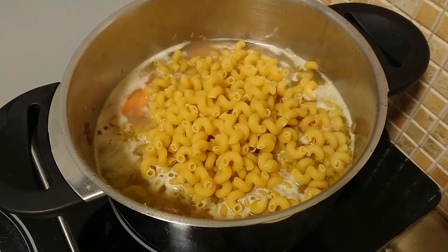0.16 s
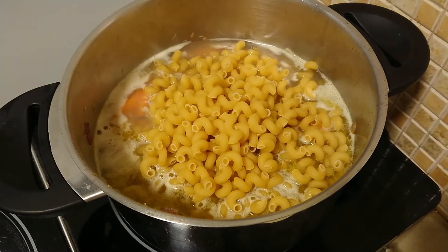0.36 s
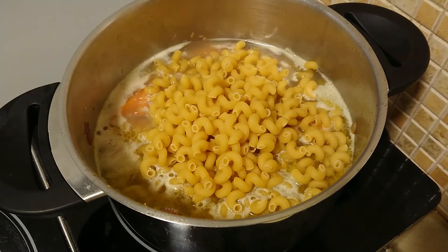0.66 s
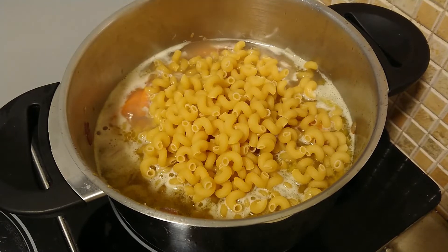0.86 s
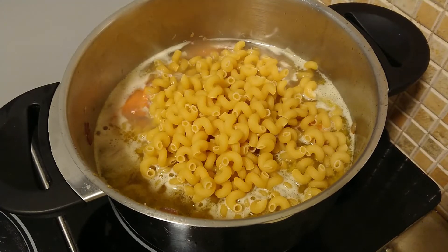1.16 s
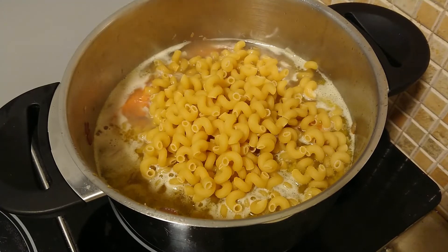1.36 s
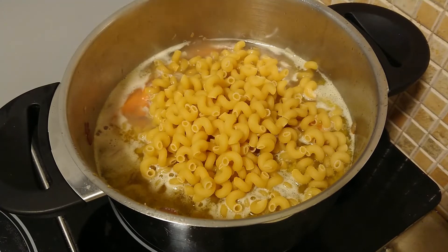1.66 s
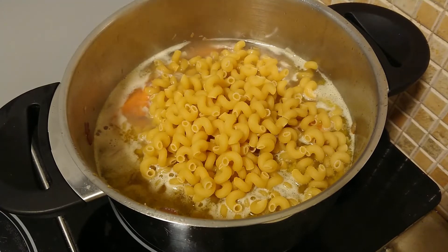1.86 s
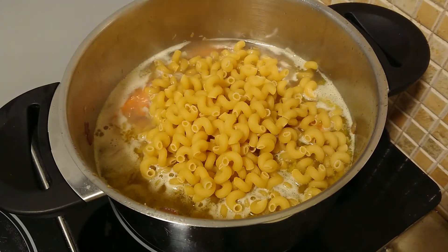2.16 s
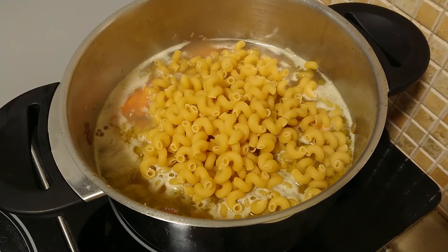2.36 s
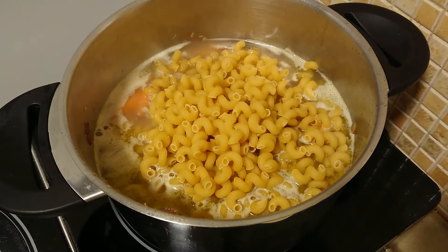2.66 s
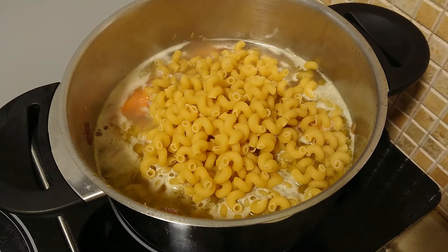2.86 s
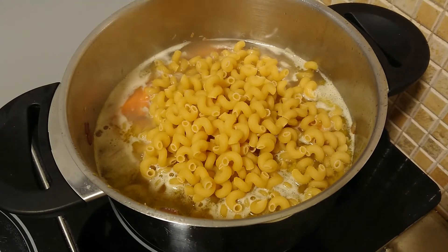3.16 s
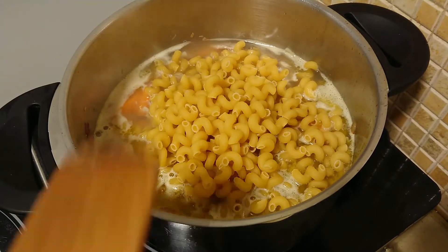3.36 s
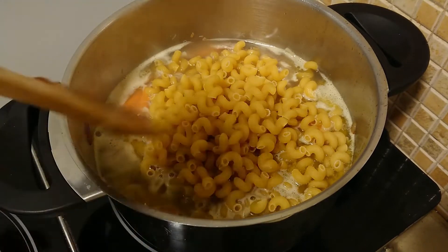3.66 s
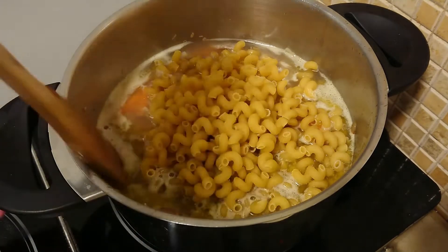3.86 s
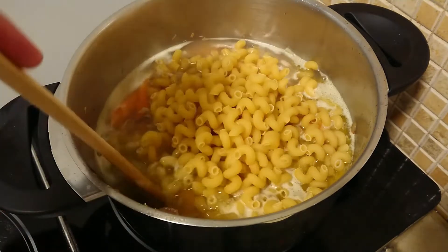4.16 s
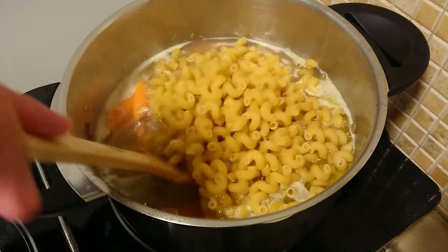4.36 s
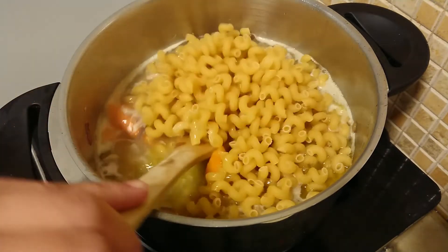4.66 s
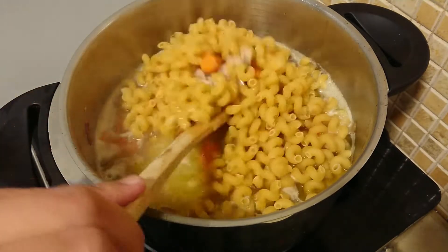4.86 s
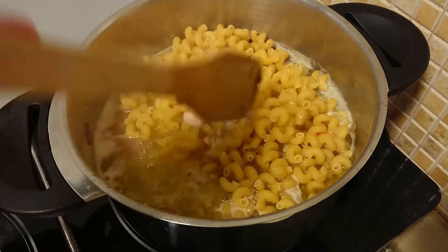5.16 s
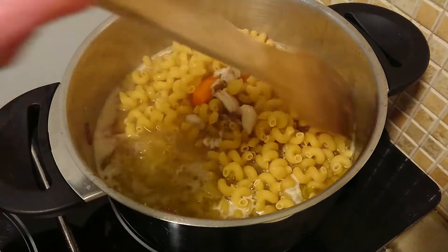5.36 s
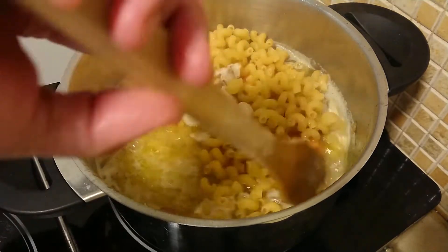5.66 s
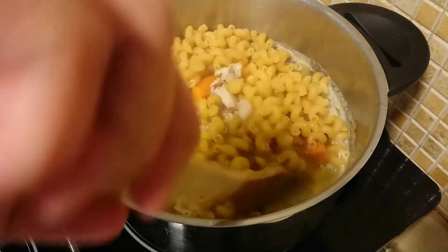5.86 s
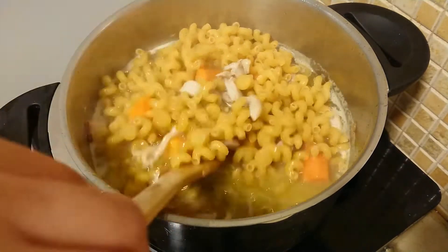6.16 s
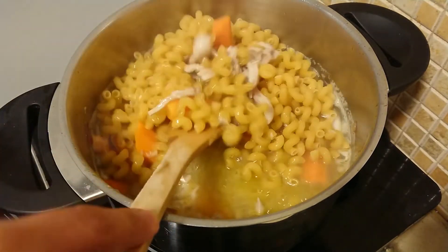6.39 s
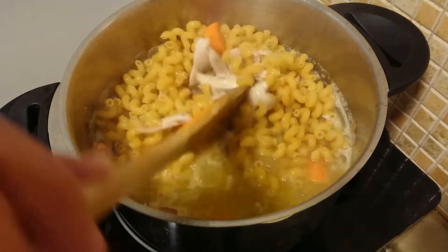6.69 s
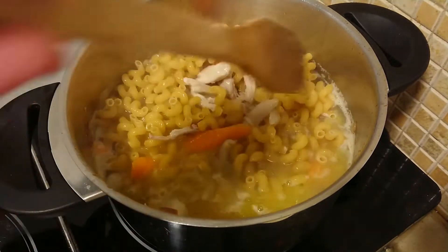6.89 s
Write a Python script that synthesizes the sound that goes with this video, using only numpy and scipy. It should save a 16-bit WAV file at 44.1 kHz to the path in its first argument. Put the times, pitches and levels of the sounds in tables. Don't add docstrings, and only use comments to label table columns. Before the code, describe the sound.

Close stereo in a small, hard-walled kitchen with a short room tail. First there is only fan rumble, faint hiss and sparse simmer ticks. Wood scrapes lightly, then two loud knocks ring the worktop. Soft dull bumps follow as the spoon enters the pot, then three bursts of stirring: dry brittle pasta clatter mixed with fizzy, sloshing liquid and one small gulp, fading to the fan.

```python
import sys
import numpy as np
from scipy import signal
from scipy.fft import rfft, irfft, next_fast_len
from scipy.io import wavfile
from scipy.ndimage import uniform_filter1d

SR = 44100
rng = np.random.default_rng(int(sys.argv[2]) if len(sys.argv) > 2 else 0)


def convert_level_to_amplitude(level_db):
    exponent = np.asarray(level_db, float) / 20
    return 10 ** exponent


def persist_wave(psi):
    counts = np.round(np.clip(psi, -1, 1) * 32767).astype(np.int16)
    wavfile.write(sys.argv[1], SR, np.atleast_2d(counts).T)


N = 310023

# time_s, level_db
FIRST_STROKE = [(4.03, -69), (4.136, -68), (4.24, -66.5), (4.33, -68), (4.40, -58), (4.52, -58.5),
                (4.585, -62.5), (4.66, -53.5), (4.74, -58.5)]
FIRST_SWEEP = [(4.8, -56.5), (4.885, -53.5), (4.91, -46), (4.99, -53), (5.06, -51), (5.11, -57),
               (5.18, -52.5), (5.238, -66.5), (5.4, -77)]
SECOND_STROKE = [(5.47, -78), (5.51, -55), (5.555, -60), (5.6, -52), (5.65, -57.5), (5.75, -60.5),
                 (5.8, -58.5), (5.86, -59.5)]
THIRD_STROKE = [(5.9, -60), (6.07, -58.5), (6.14, -50), (6.23, -57), (6.33, -55), (6.4, -52), (6.55, -57.5),
                (6.75, -62), (6.92, -68), (7.03, -91)]
# start_s, fizz_against_rattle_db
WETNESS = [
    (4.03, 4),
    (5.45, -10),
    (5.87, -4),
]
# frequency_hz, density_db_per_hz
RATTLE_COLOUR = [(350, -41), (600, -4), (823, 2), (957, -56), (1050, -2.5), (1980, -10.5), (2800, 0.5),
                 (3080, 2), (3340, 0), (4980, 0), (5560, -8), (7600, 0), (16000, -19)]
# frequency_hz, density_db_per_hz
FIZZ_COLOUR = [(3500, -22), (5500, -17), (8000, -10), (10000, -18.5), (13000, -21.5), (16000, -21)]
# start_s, peak_db, ring_hz
HEAVY_TICKS = [(4.0695, -29.5, 5530), (4.0935, -33.5, 2380), (4.672, -23.5, 4860), (4.7159, -29, 6200),
               (4.7481, -22, 3300), (4.7844, -48, 4200), (4.8589, -32, 7860), (4.8969, -16, 5100),
               (4.954, -27.5, 4500), (5.0185, -28, 7740), (5.0484, -21, 4300), (5.1008, -35, 5500),
               (5.224, -40, 2190), (5.4729, -26, 2260), (5.5857, -23, 3420), (5.697, -42, 2570),
               (5.7706, -35, 3170), (5.7855, -33, 5830), (6.1209, -32, 5800), (6.142, -27, 6000),
               (6.1912, -28.5, 3140), (6.269, -32, 4020), (6.4212, -36, 4640), (6.4463, -30.5, 2350),
               (6.5126, -25.5, 5520), (6.6647, -32, 5260), (6.7528, -32, 2580), (6.7674, -41, 4200),
               (6.781, -34.5, 7900)]
# start_s, peak_db, ring_hz
LIGHT_TICKS = [(4.2043, -38.5, 6160), (4.2423, -39, 4080), (4.279, -41, 4200), (4.3999, -49, 2170),
               (4.4785, -31, 8600), (4.5132, -33, 6300), (4.5925, -38, 8000), (4.618, -30.5, 8500),
               (4.6425, -36, 4600), (4.8335, -30.5, 3600), (5.185, -33, 5100), (5.4979, -19, 4320),
               (5.5672, -23.5, 3300), (5.606, -33, 3700), (5.7132, -29.5, 3110), (5.9491, -29, 5440),
               (5.9702, -31.5, 6140), (6.048, -40.5, 4260), (6.187, -32, 3500), (6.3365, -37, 7000),
               (6.3488, -30, 4700), (6.378, -27.5, 3590), (6.5326, -35, 3620), (6.6025, -36.5, 6460),
               (4.6672, -31, 4940), (4.892, -27, 4930), (5.173, -37, 9000), (5.181, -32.5, 7440),
              (5.212, -37.5, 7700), (5.663, -33.5, 4300), (6.5001, -43, 3600), (6.8853, -58, 7760),
              (6.9, -52, 8200), (6.916, -43, 8850)]
# start_s, peak_db, ring_hz
TUMBLES = [(4.0477, -43, 4700), (4.132, -52, 5520), (4.1475, -44, 4940), (4.1649, -55, 7910),
           (4.1954, -46, 4870), (4.2184, -40, 7850), (4.335, -48, 6380), (4.3675, -37, 5230),
           (4.3944, -43, 6070), (4.4049, -30, 7900), (4.555, -42, 7660), (4.5645, -40, 7900),
           (4.6, -40, 6120), (4.786, -38, 6410), (4.802, -37, 8140), (4.8264, -38, 6930),
           (4.8654, -31, 6340), (5.002, -31, 7530), (5.0534, -29, 7910), (5.1173, -41, 5960),
           (5.1284, -37, 5900), (5.145, -42, 5860), (5.1954, -41, 7820), (5.5747, -35, 4550),
           (5.5914, -38, 4700), (5.7364, -58, 4600), (5.8474, -48, 4640), (5.876, -50, 5560),
           (5.9274, -43, 6230), (5.9944, -38, 5810), (6.0955, -40, 5450), (6.128, -31, 6370),
           (6.1654, -37, 7910), (6.2367, -43, 5540), (6.2866, -43, 5020), (6.3854, -29, 5170),
           (6.4634, -47, 8500), (6.4817, -45, 6530), (6.5804, -49, 4960), (6.6486, -41, 4600),
           (6.7136, -46, 4680), (6.7904, -52, 5160), (6.8294, -46, 6460), (6.8653, -47, 7560),
           (6.9646, -64, 4530), (7.015, -57, 4530)]
# start_s, peak_db, ring_hz
OVERTONES = [(0.302, -44.5, 6000), (3.039, -37.5, 6540), (3.7698, -39.5, 7500), (3.857, -51, 7000),
             (3.875, -52, 8000), (5.698, -44, 5000), (4.2424, -38, 8400), (4.279, -46, 8000),
             (4.7478, -23, 6470), (4.763, -33, 4600), (4.879, -30.5, 7000), (4.8965, -25, 8000),
             (4.916, -31, 7800), (5.0195, -23, 6000), (5.4975, -29, 7700), (5.5668, -35.5, 7400),
             (6.356, -37, 4500), (6.378, -37, 7800), (6.4463, -34.5, 5800), (6.513, -32, 9200),
             (6.513, -40, 13000)]
# start_s, peak_db, ring_hz
TOUCH = [
    (3.7698, -31, 2840),
]
# frequency_hz, width_hz, level_db
POT_MODES = [(605, 25, 6.5), (870, 40, -3.5), (2190, 24, 4.5), (3260, 24, -6), (4260, 32, -16)]
# start_s, peak_db, frequency_hz, t60_s
WALL_RINGS = [(4.335, -50, 2100, 0.065), (4.4, -37.5, 2130, 0.064), (4.557, -48, 2100, .05),
              (4.673, -37, 3170, .04), (4.75, -32, 3140, .05), (4.834, -38, 4350, .04),
              (4.947, -33, 3130, 0.076), (5.184, -40, 2900, .04), (5.224, -25, 2180, 0.031),
              (6.194, -43, 3170, .04), (6.237, -50, 3100, .04), (6.286, -44, 3190, .06),
              (6.355, -43, 3130, .06), (6.377, -41, 3150, 0.064), (6.398, -36.5, 3130, .06),
              (6.423, -48, 3070, .04), (6.452, -33, 2440, 0.047), (6.641, -47, 2570, .05),
              (6.667, -37.5, 4260, 0.026), (6.767, -45, 4220, .04)]
# start_s, peak_db, frequency_hz, t60_s
BUMPS = [(.30, -43, 399, 0.051), (2.972, -51, 644, 0.1), (3.074, -39.5, 662, 0.043),
         (3.769, -37, 423, 0.072), (3.856, -35.5, 457, 0.053), (3.86, -43, 900, 0.06),
         (3.885, -44, 382, 0.09), (3.915, -44.5, 521, 0.07), (5.417, -31.5, 326, 0.034),
         (5.422, -43.5, 815, 0.049), (6.074, -43, 319, 0.21), (6.12, -45, 383, 0.089),
         (6.45, -32, 900, 0.01), (6.864, -36.5, 1410, 0.012)]
# start_s, peak_db, start_hz, end_hz, length_s
GULPS = [
    (4.711, -35.5, 430, 268.6, 0.03),
]
# start_s, peak_db, hardness_hz, left_right_db, ringing_against_crack_db
LIFT = [
    (2.0351, -25.5, 9060, -1.5, 5.5),
    (2.0445, -31.5, 6000, -7, 3),
]
FIRST_KNOCK = [(2.2522, -17.5, 2980, 1.9, -7), (2.2565, -14.5, 4830, 1.3, 1),
               (2.261, -16.5, 6950, 1.1, 1.5), (2.281, -25.5, 5000, -1.5, 6),
               (2.305, -23, 4000, -1.5, -5.5), (2.353, -32.5, 4000, -1.5, -2),
               (2.358, -32.5, 4000, -1.5, 0)]
SECOND_KNOCK = [(2.6398, -12, 2500, 1, -3.5), (2.647, -16, 4000, 1.4, -4), (2.653, -21, 5000, 1.3, -4),
                (2.660, -22, 6000, 1.3, 7), (2.668, -23, 5000, 1.5, -1)]
# start_s, peak_db, frequency_hz, t60_s
THUMPS = [
    (2.6398, -7.5, 710, 0.024),
    (2.2565, -26.5, 510, 0.03),
    (2.3545, -29.5, 1070, 0.074),
]
# frequency_hz, width_hz, level_db
LIFT_MODES = [(876, 26, -23), (2700, 130, -7), (3020, 120, -4.5), (3500, 220, -7), (3963, 110, -4.5),
              (6660, 200, -16)]
# frequency_hz, density_db_per_hz
LIFT_CRACK = [(500, -30), (880, -12), (1300, -22), (2300, -18), (2800, -4), (4000, -3), (4500, -20),
              (6500, -15), (11000, -24), (16000, -42)]
# frequency_hz, density_db_per_hz
KNOCK_CRACK = [(150, 4.5), (400, -27), (560, -7.5), (1000, -11.5), (2000, -6.5), (3300, -23.5),
               (4500, -7.5), (5100, -23), (5600, -16), (8000, -20), (13500, -33), (16000, -48)]
WORKTOP_HZ = [616, 725, 829, 934, 1045, 1260, 1454, 1570, 1700, 1899, 2001, 2199, 2440, 2563, 2720, 2890,
              3228, 3296, 3500, 4100, 4344, 4490, 5490, 6200, 6790, 7275, 7505, 9660]
WORKTOP_WIDTH_HZ = [53, 18, 100, 41, 53, 86, 13, 25.3, 290, 10.4, 29, 43, 18, 19, 33, 23, 24, 30, 28, 91,
                    22, 37, 37, 58, 26, 27, 25, 17]
FIRST_MODE_DB = [-3, -24.5, 2.5, -6, -7, -10.5, -12.5, -3, -8, -3, -3.5, -12, -8, -4, -3.5, -9.5, -2.5, -12,
                 -14.5, -14, -11.5, -26, -3, -24.5, -8, -26, -15, -17]
SECOND_MODE_DB = [-17, -39, -23.5, -10, -6, -15.5, -16.5, -1.5, -33, -29, -5, -3, -6.5, -6, -5.5, -29, -10,
                  -12, -8, -20, -20, -17, -11, -15, -17, -31.5, -31, -21.5]
# start_s, peak_db, ring_hz
SIMMER_TICKS = [(0.058, -51, 2200), (0.2113, -42.5, 2200), (0.302, -39, 2080), (0.7455, -45.5, 1310),
                (1.076, -43, 1980), (1.2185, -47, 1970), (1.2705, -50, 2040), (1.3263, -47, 3180),
                (1.916, -51, 2050), (1.984, -49, 2090), (3.039, -35, 2700), (3.251, -44.5, 1250),
                (3.6236, -43, 2080)]
# start_s, peak_db, ring_hz
PINGS = [(0.5754, -63, 3800), (1.0044, -82, 3550), (1.2186, -65, 4600), (1.2715, -52.5, 3700),
         (1.3274, -56, 5050)]
# frequency_hz, density_db_per_hz
RUMBLE_COLOUR = [(15, -44.5), (25, -59.5), (35, -65.5), (45, -12), (91, -8.5), (124, -7), (158, -9),
                 (210, -18), (237, -11.5), (279, -17.5), (330, -10.5), (372, -21.5), (900, -59.5),
                 (1170, -61), (1980, -120)]
# time_s, level_db
DRAUGHT = [(0.0, -58), (0.39, -61.5), (1.39, -54.5), (3.27, -59.5), (3.37, -52.5), (3.54, -67.5),
           (3.7, -57), (3.86, -71), (3.89, -59.5), (6.11, -67.5), (6.95, -63), (7.03, -73.5)]
# time_s, level_db
DRONE = [(0.0, -57), (0.19, -51), (0.37, -55), (0.55, -46.5), (1.02, -64.5), (1.27, -47.5), (1.74, -47),
         (1.9, -57), (2.27, -55.5), (2.6, -71.5), (2.64, -54.5), (4.42, -60.5), (5.09, -80), (5.5, -56.5),
         (6.32, -60), (6.7, -52), (6.99, -60), (7.03, -80)]
# frequency_hz, density_db_per_hz
AIR_COLOUR = [(290, -19), (500, 1), (688, -4), (1020, -4.5), (1400, -11), (1980, -5.5), (2930, -13),
              (5710, -21.5), (6800, -22), (11300, -34), (12300, -41), (13400, -45), (16000, -59)]
# frequency_hz, rms_db
WHINE = [(2972, -90), (3155, -91), (3558, -92), (4484, -91), (4581, -93), (4630, -90), (4969, -89),
         (6040, -97), (6089, -94), (6627, -96)]
# frequency_hz, t60_s
KITCHEN_DECAY = [(200, 0.46), (800, 0.34), (2500, 0.36), (8000, 0.28)]
# frequency_hz, correlation
LIKENESS = [(60, .93), (130, .97), (290, .8), (640, .2), (1400, 0)]
# frequency_hz, left_right_db
LEAN = [(60, -5.5), (380, -4.5), (700, -1.5), (2400, -3.5), (8000, -1.5), (15000, -3)]
LAG_S = .0002


def rms_one(x):
    return x / np.sqrt(np.mean(x ** 2) + 1e-20)


def in_time(rows):
    s, level = np.transpose(rows)
    return np.interp(np.arange(N) / SR, s, level)


def at_hz(points, hz):
    point_hz, value = np.transpose(points)
    return np.interp(np.log(np.maximum(hz, 1)), np.log(point_hz), value)


def colour(x, spectrum):
    log_gain = at_hz(spectrum, np.fft.rfftfreq(4096, 1 / SR)) * np.log(10) / 20
    cepstrum = irfft(log_gain)
    cepstrum[1:2048] *= 2
    cepstrum[2049:] = 0
    taps = irfft(np.exp(rfft(cepstrum)))
    taps = taps / np.sqrt(np.sum(taps ** 2))
    return signal.fftconvolve(x, taps[None], axes=1)[:, :x.shape[1]]


def drift(rate):
    r = np.exp(-80 * np.pi * rate / SR)
    noise = rng.standard_normal(N // 40 + 2002)
    slow = signal.lfilter([1], [1, -2 * r, r * r], noise)[2000:]
    return np.interp(np.arange(N) / 40, np.arange(len(slow)), rms_one(slow))


def ring(clicks, hz, width_hz):
    r, w = np.exp(-np.pi * width_hz / SR), 2 * np.pi * hz / SR
    return signal.lfilter([0, np.sin(w)], [1, -2 * r * np.cos(w), r * r], clicks + 1e-18)


def pair(size):
    fast = next_fast_len(size)
    mid, side = rfft(rng.standard_normal((2, fast)))
    alike = np.clip(at_hz(LIKENESS, np.fft.rfftfreq(fast, 1 / SR)), -1, 1)
    spectra = np.sqrt(.5 + alike / 2) * mid + np.sqrt(.5 - alike / 2) * side * [[1], [-1]]
    return irfft(spectra, fast)[:, :size]


def direct_noise(size, shared):
    same, left, right = rng.standard_normal((3, size))
    later = np.roll(same, round(LAG_S * SR))
    return shared ** .5 * np.array([same, later]) + (1 - shared) ** .5 * np.array([left, right])


def add(out, s, sound):
    i = round(s * SR)
    out[:, i:i + sound.shape[1]] += sound[:, :N - i]


def grains(per_s, low_hz, high_hz, cycles, spread_db):
    happens = rng.random(N) < per_s / SR
    sizes = convert_level_to_amplitude(spread_db * np.minimum(rng.exponential(1, N), 4)) * happens
    heard = sizes * rng.standard_normal((2, N))
    dealt = rng.integers(0, 12, N)
    pitches = np.geomspace(low_hz, high_hz, 12)
    return rms_one(sum(ring(heard * (dealt == k), hz, hz / cycles) for k, hz in enumerate(pitches)))


def stirring():
    t = np.arange(N) / SR
    push_db = in_time(FIRST_STROKE + FIRST_SWEEP + SECOND_STROKE + THIRD_STROKE)
    mean_push_db, density_follows = -58.5, 0.36
    swing_db = push_db - mean_push_db
    moving = np.clip((t - FIRST_STROKE[0][0]) / 0.16, 0, 1)
    clumps = convert_level_to_amplitude(4.5 * drift(40) + density_follows * swing_db)

    rattle = grains(3500 * clumps, 887, 8400, cycles=14.0, spread_db=5.5)
    rattle = rms_one(colour(rattle, RATTLE_COLOUR))
    rattle_db = push_db - 2.0 - density_follows / 2 * swing_db

    wet_db = np.zeros(N)
    for start_s, db in WETNESS:
        wet_db[t >= start_s] = db
    fizz = grains(9000 * clumps, 3260, 14800, cycles=7.0, spread_db=4.5)
    fizz = fizz + convert_level_to_amplitude(-10) * np.sqrt(clumps) * direct_noise(N, shared=0.25)
    fizz = rms_one(colour(fizz, FIZZ_COLOUR))
    fizz_db = mean_push_db + 0.69 * swing_db + wet_db

    sluggish = uniform_filter1d(moving * convert_level_to_amplitude(0.56 * swing_db), int(0.14 * SR))
    slosh = colour(pair(N), AIR_COLOUR) * sluggish * convert_level_to_amplitude(-58.5 + 2.2 * drift(6.2))
    return moving * (rattle * convert_level_to_amplitude(rattle_db) + fizz * convert_level_to_amplitude(fizz_db)), slosh


def ticks(rows, cycles, snap_s, settle_db, settle_s, body_db, edge_db, gain_db):
    out, t = np.zeros((2, N)), np.arange(1800) / SR
    edge = signal.butter(2, [6500, 10500], "band", fs=SR, output="sos")
    body = signal.butter(2, [700, 2500], "band", fs=SR, output="sos")
    for s, db, hz in rows:
        bounces = (rng.random(len(t)) < .012) * rng.exponential(7.7, len(t))
        settling = convert_level_to_amplitude(settle_db - 20.0 * t / settle_s) * bounces
        settling = signal.lfilter([1], [1, -.97], settling)
        envelope = 0.97 * np.exp(-t / 0.00014) + np.exp(-t / snap_s) + settling
        snap = direct_noise(len(t), shared=0.21) * envelope

        partials = hz * np.array([[1], [rng.uniform(0.74, 0.78)], [rng.uniform(0.81, 1.3)]])
        sines = np.sin(2 * np.pi * partials * t) * np.exp(-t * partials / cycles)
        tone = np.sum(sines * [[1], [.55], [.45]], axis=0)
        middle = signal.butter(3, [hz / 1.63, min(hz * 1.524, 15500)], "band", fs=SR, output="sos")

        sound = 0.4 * np.array([tone, np.roll(tone, round(LAG_S * SR))])
        sound += 0.99 * signal.sosfilt(middle, snap)
        sound += convert_level_to_amplitude(body_db) * signal.sosfilt(body, snap)
        sound += convert_level_to_amplitude(edge_db) * signal.sosfilt(edge, snap)
        top_hz = np.clip(hz * 2.64 * convert_level_to_amplitude(1.1 * (db + 27.5)), 3000, 15000)
        sound = signal.lfilter(*signal.butter(2, top_hz, fs=SR), sound)
        pan_db = rng.normal(0, 1.9) * np.array([[1], [-1]])
        add(out, s, sound / np.abs(sound).max() * convert_level_to_amplitude(db + gain_db + pan_db))
    return out


def pasta_ticks():
    out = ticks(TOUCH, cycles=2.5, snap_s=0.0026, settle_db=-26, settle_s=0.04,
                body_db=11.0, edge_db=-22, gain_db=5)
    out += ticks(HEAVY_TICKS, cycles=10.0, snap_s=0.0022, settle_db=-25, settle_s=0.03,
                 body_db=-1.5, edge_db=-44, gain_db=0.06)
    out += ticks(LIGHT_TICKS, cycles=13.0, snap_s=0.0024, settle_db=-31.0, settle_s=0.011,
                 body_db=-5.5, edge_db=-38, gain_db=2.1)
    out += ticks(TUMBLES, cycles=13.0, snap_s=0.0028, settle_db=-40, settle_s=.01,
                 body_db=-9, edge_db=-43, gain_db=-2.0)
    out += ticks(OVERTONES, cycles=9.8, snap_s=0.0015, settle_db=-45, settle_s=.01,
                 body_db=-30, edge_db=-35, gain_db=2.5)
    return out


def pot_wall(x):
    out = 0
    for hz, width_hz, db in POT_MODES:
        out = out + convert_level_to_amplitude(db) * 2 * np.pi * width_hz / SR * ring(x, hz, width_hz)
    return out


def wall_rings():
    out, t = np.zeros((2, N)), np.arange(SR // 8) / SR
    arrival = np.maximum(t - np.array([[0], [LAG_S]]), 0)
    for s, db, hz, t60 in WALL_RINGS:
        envelope = convert_level_to_amplitude(db - 60 * arrival / t60) * (1 - np.exp(-arrival / 0.00082))
        add(out, s, envelope * np.sin(2 * np.pi * hz * arrival))
    return out


def bumps(rows, pan_db):
    out, t = np.zeros((2, N)), np.arange(SR // 4) / SR
    for s, db, hz, t60 in rows:
        modes = np.sin(2 * np.pi * hz * t)
        modes += 0.31 * np.sin(2 * np.pi * 1.9 * hz * t)
        modes += 0.59 * np.sin(2 * np.pi * 0.86 * hz * t)
        envelope = convert_level_to_amplitude(db - 60 * t / t60) * (1 - np.exp(-2 * hz * t))
        add(out, s, envelope * modes * convert_level_to_amplitude([[pan_db / 2], [-pan_db / 2]]))
    return out


def gulps():
    out, t = np.zeros((2, N)), np.arange(SR // 10) / SR
    for s, db, start_hz, end_hz, length in GULPS:
        part = np.clip(t / length, 0, 1)
        hz = end_hz + (start_hz - end_hz) * np.exp(-3.5 * part)
        glide = np.sin(2 * np.pi * np.cumsum(hz) / SR)
        add(out, s, convert_level_to_amplitude(db) * np.sin(np.pi * part) ** 0.39 * glide * np.ones((2, 1)))
    return out


def knock(contacts, modes, crack, crack_db, crack_s):
    out, t = np.zeros((2, N)), np.arange(SR // 7) / SR
    arrival = np.maximum(t - np.array([[0], [.00006]]), 0)
    thin = signal.butter(3, 450, "high", fs=SR, output="sos")
    for s, db, hard_hz, pan_db, ring_db in contacts:
        sound = convert_level_to_amplitude(crack_db) * colour(pair(len(t)) * np.exp(-t / crack_s), crack)
        for hz, width_hz, mode_db in modes:
            gain = convert_level_to_amplitude(ring_db + mode_db + 2 * rng.standard_normal((2, 1))) * rng.choice([-1, 1])
            decay = np.exp(-np.pi * max(width_hz, 12.0) * t)
            sound = sound + gain * np.sin(2 * np.pi * hz * arrival) * decay
        soft = signal.lfilter(*signal.butter(1, hard_hz, fs=SR), sound)
        add(out, s, signal.sosfilt(thin, soft) * convert_level_to_amplitude([[db + pan_db / 2], [db - pan_db / 2]]))
    return out


def worktop():
    first_modes = list(zip(WORKTOP_HZ, WORKTOP_WIDTH_HZ, FIRST_MODE_DB))
    second_modes = list(zip(WORKTOP_HZ, WORKTOP_WIDTH_HZ, SECOND_MODE_DB))
    out = knock(LIFT, LIFT_MODES, LIFT_CRACK, crack_db=0.5, crack_s=0.0017)
    out += knock(FIRST_KNOCK, first_modes, KNOCK_CRACK, crack_db=5.0, crack_s=0.014)
    out += knock(SECOND_KNOCK, second_modes, KNOCK_CRACK, crack_db=3.5, crack_s=0.0078)
    out += bumps(THUMPS, pan_db=4.0)
    return signal.lfilter(*signal.iirnotch(5100, 5100 / 330, fs=SR), out)


def simmer():
    per_s = 400 * convert_level_to_amplitude(2 * drift(23) + 2.9 * drift(4.3))
    out = convert_level_to_amplitude(-66) * grains(per_s, 900, 3040, cycles=6.0, spread_db=-7.0)
    out += ticks(SIMMER_TICKS, cycles=13.0, snap_s=0.0017, settle_db=-47.5, settle_s=0.011,
                 body_db=2.0, edge_db=-11, gain_db=-0.5)
    out += ticks(PINGS, cycles=22, snap_s=.0004, settle_db=-48, settle_s=.01,
                 body_db=-21, edge_db=-40, gain_db=8.0)
    return out


def kitchen():
    t = np.arange(SR // 2) / SR
    spectrum, hz = rfft(pair(len(t))), np.fft.rfftfreq(len(t), 1 / SR)
    edges_hz = 28 * 2 ** np.arange(0, 9.4, 1 / 3)
    tail = np.zeros((2, len(t)))
    for low, high in zip(edges_hz, edges_hz[1:]):
        band = irfft(spectrum * ((hz >= low) & (hz < high)), len(t))
        tail += band * convert_level_to_amplitude(-60 * t / at_hz(KITCHEN_DECAY, low))
    tail *= np.clip((t - .002) / 0.0065, 0, 1)
    return tail / np.sqrt(np.sum(tail ** 2) / 2)


def fan():
    t = np.arange(N) / SR
    phase = 2 * np.pi * 127.1 * t + 1.6 * drift(1)
    drone = np.sqrt(2) * np.sin(phase) * convert_level_to_amplitude(in_time(DRONE))
    rumble = colour(pair(N), RUMBLE_COLOUR) * convert_level_to_amplitude(-54.5 + 0.1 * t + 1.5 * drift(18))
    draught_db = in_time(DRAUGHT)
    deep = signal.sosfiltfilt(signal.butter(2, 108, fs=SR, output="sos"), rumble)
    rumble = rumble + deep * (convert_level_to_amplitude(draught_db - draught_db.mean()) - 1)
    air = colour(pair(N), AIR_COLOUR) * convert_level_to_amplitude(-61 + drift(20))
    whine = np.zeros((2, N))
    for hz, db in WHINE:
        whine += convert_level_to_amplitude(db + 6.5) * np.sin(2 * np.pi * hz * t + rng.uniform(0, 2 * np.pi, (2, 1)))
    return drone + rumble + air + whine


def scene():
    heap, slosh = stirring()
    pot = heap + pasta_ticks() + simmer()
    pot += pot_wall(pot)
    pot += wall_rings()
    dull = bumps(BUMPS, pan_db=1.0) + gulps()
    knocks = worktop()
    sent = convert_level_to_amplitude(-5.5) * knocks + convert_level_to_amplitude(-7.5) * pot + convert_level_to_amplitude(-8) * dull
    room = signal.fftconvolve(sent.mean(axis=0)[None], kitchen(), axes=1)[:, :N]
    return knocks + pot + dull + room + slosh + fan()


def band_limit(x):
    return signal.sosfilt(signal.butter(12, 16490, fs=SR, output="sos"), x)


def record(dry):
    fast = next_fast_len(N)
    lean_db = at_hz(LEAN, np.fft.rfftfreq(fast, 1 / SR)) / 2
    leaning = irfft(rfft(dry, fast) * convert_level_to_amplitude([lean_db, -lean_db]), fast)[:, :N]
    rounded = .8 * np.tanh(leaning / .8)
    no_rumble = signal.sosfilt(signal.butter(3, 55, "high", fs=SR, output="sos"), rounded)
    mix = signal.sosfilt(signal.cheby2(12, 70, 16900, fs=SR, output="sos"), no_rumble)
    return band_limit(mix)


dry = scene()
out = record(dry)
persist_wave(out)
```